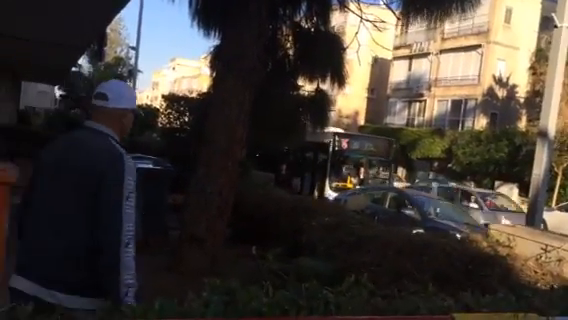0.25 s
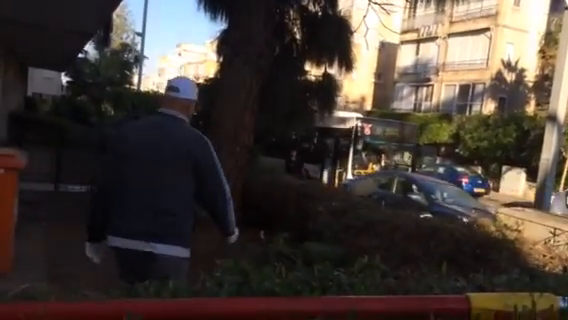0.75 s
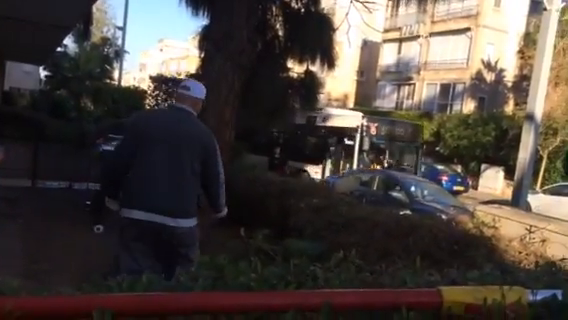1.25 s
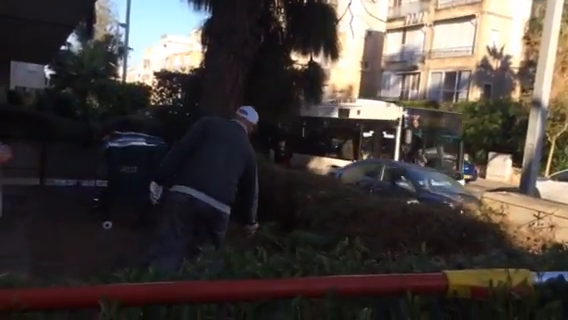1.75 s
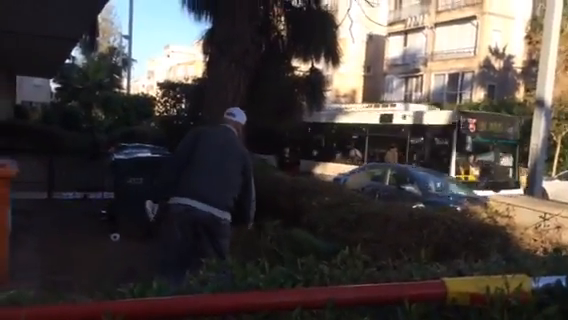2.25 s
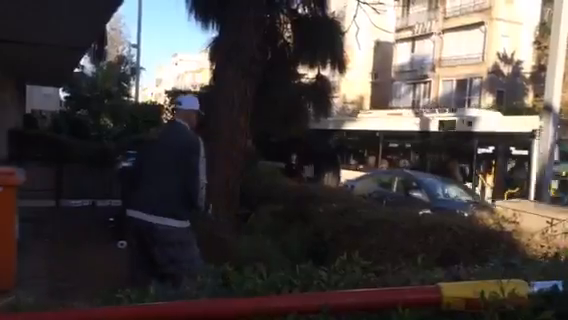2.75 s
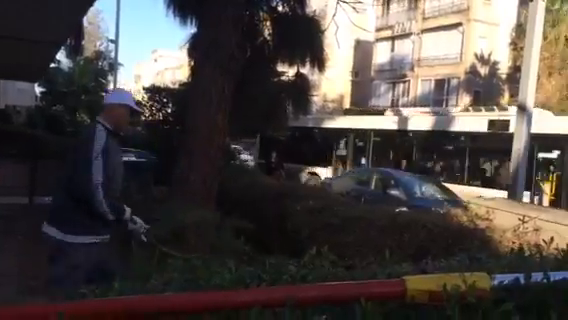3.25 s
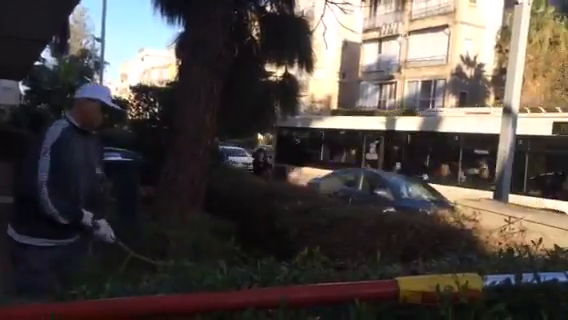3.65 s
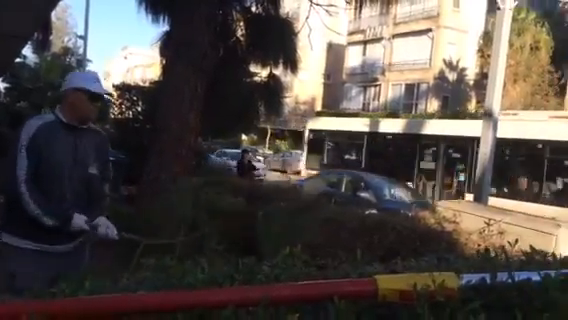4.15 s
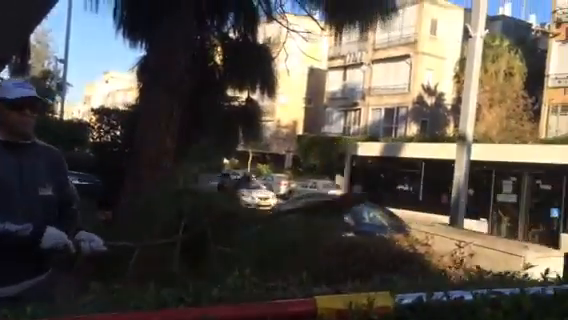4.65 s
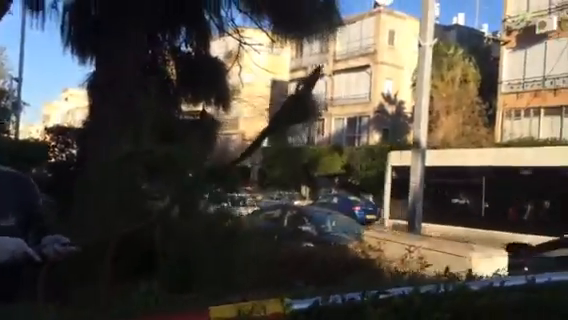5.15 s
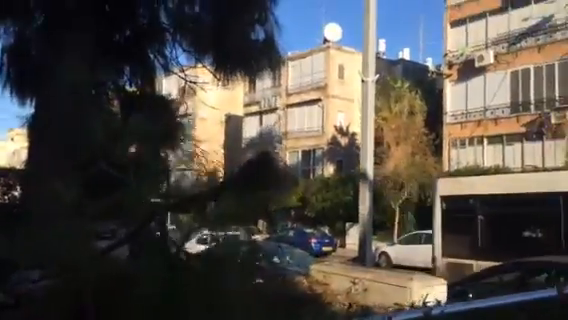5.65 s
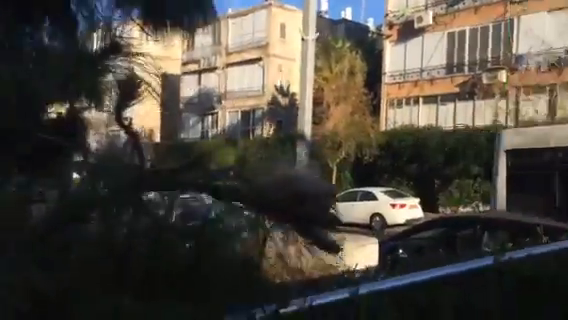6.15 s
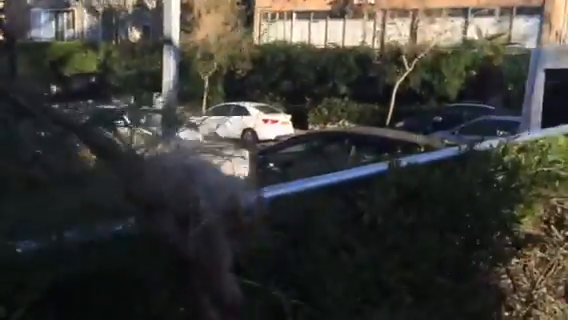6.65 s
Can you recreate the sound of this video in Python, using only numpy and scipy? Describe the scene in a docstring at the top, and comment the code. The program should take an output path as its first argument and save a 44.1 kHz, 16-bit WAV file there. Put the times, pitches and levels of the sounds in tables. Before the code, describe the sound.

A city street is heard from a front garden, with a low rumble and traffic roar throughout and slight echoes off the houses. A diesel bus idles, then from about 0.3 seconds its drone climbs in pitch, joined by a faint gear whine and a thin intake whistle. A car passes at around 0.6 seconds and another, fainter, near 2.3. Twigs tick softly close by during the first 2.5 seconds. From 3 to 4.5 seconds the bus passes close, its body ringing hollow as the whine and roar swell, with car engines humming behind it. The engine pitch dips for a gear change around 5 seconds, rises again, then falls near 6, where the brakes give a brief high squeal. From about 6.3 seconds the rear engine comes through with a fan rush and clatter, with two tiny squeaks and one more twig tick before the end near 7 seconds.

```python
"""A diesel bus drones up from idle and pulls away along a city street, heard on one microphone in a front
garden. Its firing rate drives the exhaust tones, the whine of gears and turbocharger, and the pulsing of the
intake. The hollow flank passes close, the engine shifts up, the brakes squeal briefly, and at last the rear
engine bay swings into the open with a clatter. Cars pass behind it in the roar of the street, the house fronts
send back echoes, and twigs tick softly near the microphone."""
import sys
import numpy as np
from scipy import signal
from scipy.fft import rfft, irfft
from scipy.io import wavfile
from scipy.ndimage import uniform_filter1d

SR = 44100
rng = np.random.default_rng(int(sys.argv[2]) if len(sys.argv) > 2 else 0)


def pcm_store(signal):
    """Save signal as 16-bit PCM."""
    levels = np.round(np.clip(np.atleast_2d(signal), -1, 1) * 32767)
    wavfile.write(sys.argv[1], SR, levels.astype(np.int16).T)


N = 304225
TIME = np.arange(N) / SR
BINS_HZ = np.fft.rfftfreq(N, 1 / SR)

# engine speed, from idle up through a gear change: time_s, firing_hz
ENGINE_SPEED = [(0, 28), (.33, 28.5), (.55, 38.5), (.85, 48), (1.15, 56), (1.8, 62), (2.6, 65.5), (3.2, 71),
                (4.4, 75), (4.85, 67), (5.05, 60), (5.28, 57), (5.55, 66), (5.77, 70), (6.25, 50),
                (6.5, 47.5), (6.9, 48.5)]
# firing tone ahead of the silencer: time_s, level_db
EXHAUST_STRENGTH = [(0, -29.5), (1.3, -26.5), (2.6, -22.5), (3.15, -31.5), (4.3, -30), (4.75, -24),
                    (5.75, -24.5), (6.05, -22), (6.45, -28.5), (6.9, -23.5)]
# what the silencer lets through of that tone and its octave: frequency_hz, gain_db
SILENCER_RESPONSE = [(41, -47), (47, -2), (62, 0), (78, 0), (84, -12), (94, -7.5), (116, -4.5), (124, -13),
                     (150, -12.5)]
# a partial cancels against its echo from the house fronts: time_s, half_length_s, depth, firing_multiple
ECHO_FADES = [(1.03, .09, .93, 1), (2.19, 0.13, .87, 1), (2.88, 0.088, 0.73, 1), (5.04, 0.19, .75, 1),
              (5.86, 0.062, 0.38, 1), (6.24, 0.084, 0.6, 1), (2.7, 0.27, .7, 2), (5.03, 0.38, .85, 2)]
# timing gears, belts and, highest, the turbocharger: firing_multiple, width_hz, level_db
WHINE_TONES = [(47.3, 100, -58.5), (73, 160, -63), (99, 110, -70.5), (116, 120, -69)]
# how openly their whine carries to the garden: time_s, gain_db
WHINE_CARRY = [(0, -14), (1.3, -8), (2.7, -4.5), (3.2, .5), (4.4, -1), (5, -5), (5.9, -1), (6.9, -3)]
# air drawn into the engine: time_s, centre_hz, level_db
INTAKE_HISS = [(.45, 4750, -65.5), (1.05, 4840, -53), (1.6, 4820, -53.5), (2.5, 4730, -54),
               (4.4, 4470, -50.5), (5, 4400, -67), (5.5, 4567, -56), (6.2, 4710, -59), (6.9, 4780, -44.5)]
# the engine bay opening toward the microphone: time_s, level_db
BAY_OPENING = [(5.9, -65), (6.2, -51), (6.4, -38), (6.55, -36.5), (6.7, -32), (6.9, -33)]
# its fan rush: frequency_hz, gain_db
BAY_SPECTRUM = [(82, -50), (140, 0), (164, 2), (257, -14), (512, -9.5), (788, -12.5), (941, -13),
                (1510, -14.5), (1800, -20), (2370, -15), (3720, -19.5), (4800, -23.5), (5300, -25.5),
                (11200, -32.5), (15300, -41)]
# its ringing parts: pitch_hz, width_hz, gain_db
BAY_RESONANCES = [(163.4, 5.4, -9), (211.5, 10, -10.5), (299, 58, -13.5), (386.4, 30, -15),
                  (547, 86, -13.5), (1523, 175, -20), (2180, 220, -36), (8250, 140, -32)]
# how near the side of the bus is: time_s, gain_db
FLANK_NEARNESS = [(0, -23), (2.7, -11), (3.1, 0), (4.1, 0.5), (4.6, -7), (5, -7), (5.6, -3.5), (6.3, -10),
                  (6.9, -14)]
# its hollow body: pitch_hz, width_hz, level_db
FLANK_RESONANCES = [(372, 30, -56), (580, 40, -51.5), (790, 70, -57), (1510, 110, -56.5)]
# brakes: loudest_s, half_length_s, pitch_hz, glide_hz_per_s, level_db
BRAKE_SQUEALS = [(5.95, .1, 5380, -400, -52.5), (6.73, .025, 10930, 0, -53), (6.84, .03, 10930, 0, -51)]
# engines behind the bus: loudest_s, half_length_s, pitch_hz, glide_hz_per_s, level_db
CAR_ENGINES = [(0.09, 0.28, 154, -31, -41), (0.866, .2, 146.3, 6.5, -39), (2.55, 0.44, 154, -9.5, -47),
               (3.738, 0.7, 109.3, 4, -37.5), (4.201, 0.31, 134.3, 20, -37.5),
               (5.986, 0.327, 151.1, 18, -41.5)]
# tyres of passing cars: nearest_s, half_length_s, level_db
CAR_PASSES = [(0.647, 0.56, -46), (2.27, 0.2, -54)]
# the song of those tyres: pitch_hz, width_hz, gain_db
TYRE_RESONANCES = [(287.2, 97, -0.5), (962, 250, 2.5)]
# twigs in the garden: start_s, level_db (3.5 dB below the peak), pitch_hz
TWIG_TICKS = [(.149, -48, 7000), (.356, -39, 6460), (.456, -44, 6000), (1.172, -45, 11000),
              (1.39, -44.5, 10000), (1.402, -48, 10000), (1.476, -49, 12000), (1.492, -48, 12000),
              (1.833, -45, 9500), (1.858, -48, 11000), (1.926, -51, 12000), (1.992, -43, 9000),
              (2.07, -51, 12000), (2.402, -49, 10500), (6.721, -37, 11000)]
# roar of engines and tyres, loudest as the bus draws level: time_s, level_db
ROAR_LEVEL = [(0, -43), (.4, -41), (1.3, -43), (1.9, -44), (2.3, -42.5), (2.8, -45.5), (3.07, -40.5),
              (4.4, -39.5), (4.95, -44), (5.45, -42), (6.25, -43)]
# the street's low rumble, its roar and its fine hiss: frequency_hz, gain_db
RUMBLE_SPECTRUM = [(20, -13), (34, -10), (48, 6.5), (85, 3), (140, 2), (175, -7.5), (240, -10.5),
                   (330, -16.5), (600, -49.5)]
ROAR_SPECTRUM = [(130, -12), (220, -1), (321, -5), (367, -0.5), (414, -2), (572, -0.5), (655, -1.5),
                 (968, -4.5), (1280, -5.5), (1490, -4.5), (1980, -9.5), (3340, -12.5), (3820, -14.5),
                 (4680, -16), (5500, -20), (7150, -32), (12100, -120)]
HISS_SPECTRUM = [(3000, -30), (4800, -3), (6000, 0), (7300, 0), (9000, -5), (11000, -4.5), (13000, -10),
                 (15300, -19)]


def exhaust(firing_hz, firings):
    """Firing tone and octave through the silencer, a weak third, and half orders from unequal cylinders."""
    angle = 2 * np.pi * firings
    level_db = curves(EXHAUST_STRENGTH)[0]
    silencer = np.transpose(SILENCER_RESPONSE)
    tone_gain = amp(level_db + np.interp(firing_hz, *silencer)) * echo_fade(1)
    octave_gain = amp(level_db - 4 + np.interp(2 * firing_hz, *silencer)) * echo_fade(2)
    tone = tone_gain * np.cos(angle) * (1 + .06 * drift(18))
    octave = octave_gain * np.cos(2 * angle + .1 * drift(8))
    third = np.cos(3 * angle) * (1 + .5 * drift(2.5))
    uneven = sum(np.cos(angle * order + drift(1.7)) for order in (1.5, 2.5))
    return np.sqrt(2) * (tone + octave + amp(-57.5) * third + amp(-56.5) * uneven)


def echo_fade(multiple):
    """The gain of one exhaust partial, dipping as it meets its echo at the microphone."""
    dips = [1 - depth * swell(s, half_s) for s, half_s, depth, k in ECHO_FADES if k == multiple]
    return np.prod(dips, axis=0)


def engine_whine(firing_hz):
    """Gears, belts and the turbocharger sing fuzzy tones locked to the engine, each fading in and out."""
    tones = sum(amp(db + 1.5 * drift(1.8)) * band(multiple * firing_hz, width_hz)
                for multiple, width_hz, db in WHINE_TONES)
    return amp(curves(WHINE_CARRY)[0]) * tones


def intake(firing_hz, firings):
    """The intake whistles at low engine speed and spreads into hiss as the speed rises."""
    centre_hz, level_db = curves(INTAKE_HISS)
    fall_above_hz, fall_db_per_hz = 56.4, .35
    whistle = amp(-fall_db_per_hz * np.maximum(firing_hz - fall_above_hz, 0)) * band(centre_hz, 300)
    hiss = .5 * band(.93 * centre_hz, 450)
    gulps = 1 + .11 * np.cos(2 * np.pi * firings)  # each cylinder draws air in turn
    return amp(level_db) * unit((whistle + hiss) * gulps)


def engine_bay(firings):
    """Fan rush and diesel clatter pulse with each firing, while small parts ring and rattle."""
    knock = 1 + .5 * np.exp(-(firings % 1) / .25) * (1 + .34 * drift(30))
    rush = colour(reflections(eddies(patch_db=1.4), wall_db=-5.5) * knock, BAY_SPECTRUM)
    rings = resonances(BAY_RESONANCES)
    clicks = (rng.random(N) < 500 / SR) * rng.standard_normal(N)  # about 500 a second
    rattle = amp(-17) * colour(clicks, [(1500, -25), (4500, 6), (12000, -7), (15000, -6)])
    return amp(curves(BAY_OPENING)[0]) * (rush + rings + rattle)


def flank():
    """The body of the bus rings hollow, loudest as its side passes the garden."""
    return amp(curves(FLANK_NEARNESS)[0]) * resonances(FLANK_RESONANCES)


def brake_squeal(loudest_s, half_length_s, pitch_hz, glide_hz_per_s, level_db):
    """A brake sings briefly on one unsteady note."""
    note = band(pitch_hz + glide_hz_per_s * (TIME - loudest_s), width_hz=110)
    return amp(level_db) * swell(loudest_s, half_length_s) * note


def car_engine(loudest_s, half_length_s, pitch_hz, glide_hz_per_s, level_db):
    """An engine farther out in the street swells and fades on a gliding hum."""
    cycles = np.cumsum(pitch_hz + glide_hz_per_s * (TIME - loudest_s)) / SR
    hum = np.sqrt(2) * np.sin(2 * np.pi * cycles + .18 * drift(6.6))
    return amp(level_db) * swell(loudest_s, half_length_s) * hum


def car_tyres():
    """The song of passing tyres falls off with distance from the microphone."""
    nearness = sum(amp(db) / (1 + ((TIME - s) / half_s) ** 2) for s, half_s, db in CAR_PASSES)
    return nearness * resonances(TYRE_RESONANCES)


def twigs():
    """Each twig close by gives a sharp tick and a short splintering tail."""
    out, t = np.zeros(N), np.arange(2048) / SR
    hz = np.fft.rfftfreq(len(t), 1 / SR) + 1
    decay = np.exp(-t / .0018) + .35 * np.exp(-t / .0098)
    for start_s, level_db, pitch_hz in TWIG_TICKS:
        burst = rng.standard_normal(len(t)) * decay
        tick = irfft(rfft(burst) * np.exp(-(np.log(hz / pitch_hz) / .39) ** 2))
        tick *= amp(level_db + 3.5) / abs(tick).max()
        span = out[round(start_s * SR):][:len(t)]
        span += tick[:len(span)]
    return out


def street():
    """Wandering rumble from the far lanes, with traffic roar and tyre hiss between the house fronts."""
    roar_db, usual_roar_db = curves(ROAR_LEVEL)[0], -42
    hiss_db = -56.5 + 1.04 * (roar_db - usual_roar_db)  # below the roar, swelling a little further
    screen_db = -3 * swell(3.9, 1.1)  # the bus screens the far lanes as it goes by
    rumble_db = -35.5 + 1.2 * drift(2.3) + screen_db
    rumble = amp(rumble_db) * colour(rng.standard_normal(N), RUMBLE_SPECTRUM)
    roar = amp(roar_db) * colour(reflections(eddies(patch_db=.95), wall_db=-11.5), ROAR_SPECTRUM)
    hiss = amp(hiss_db) * colour(reflections(eddies(patch_db=2), wall_db=-8.5), HISS_SPECTRUM)
    return rumble + roar + hiss


def reflections(x, wall_db, count=14):
    """House fronts and the road return delayed copies, which ripple the spectrum; rms 1."""
    delays_s, gains = rng.uniform(.004, .09, count), rng.standard_normal(count)
    gains /= np.linalg.norm(gains)
    walls = sum(gain * np.exp(-2j * np.pi * BINS_HZ * s) for s, gain in zip(delays_s, gains))
    return unit(irfft(rfft(x) * (1 + amp(wall_db) * walls), N))


def eddies(patch_db):
    """Turbulent noise whose level varies in patches of time and frequency; rms 1."""
    frames = dict(nperseg=1024, noverlap=768)
    spectra = signal.stft(rng.standard_normal(N), **frames)[2]
    patches = uniform_filter1d(rng.standard_normal(spectra.shape), size=6, axis=0)
    patches = unit(uniform_filter1d(patches, size=16, axis=1))
    return unit(signal.istft(spectra * amp(patch_db * patches), **frames)[1][:N])


def resonances(rows):
    """Noise ringing in several steady resonances."""
    return sum(amp(db) * band(hz, width_hz) for hz, width_hz, db in rows)


def band(hz, width_hz):
    """Noise ringing in one resonance that may move; rms 1."""
    angle = 2 * np.pi * np.cumsum(hz * np.ones(N)) / SR
    return unit(drift(width_hz / 2) * np.cos(angle) + drift(width_hz / 2) * np.sin(angle))


def drift(rate_hz):
    """Random wander up to a rate; rms 1."""
    return unit(irfft(rfft(rng.standard_normal(N)) / np.sqrt(1 + (BINS_HZ / rate_hz) ** 4), N))


def colour(x, spectrum):
    """Filters by points of frequency_hz, gain_db; rms 1."""
    hz, db = np.transpose(spectrum)
    gain = amp(np.interp(np.log(BINS_HZ + 1), np.log(hz + 1), db))
    return unit(irfft(rfft(x) * gain, N))


def swell(peak_s, half_length_s):
    """A bell-shaped rise and fall; 1 at its top."""
    return np.exp(-((TIME - peak_s) / half_length_s) ** 2)


def curves(rows):
    """Each column after time_s as a curve over time."""
    time_s, *columns = np.transpose(rows)
    return [np.interp(TIME, time_s, column) for column in columns]


def amp(db):
    """Decibels to gain."""
    return 10 ** (np.asarray(db) / 20)


def unit(x):
    """Scales to rms 1."""
    return x / np.sqrt(np.mean(x ** 2) + 1e-20)


def scene():
    """The street from the garden, in mono; one engine speed drives exhaust, whine, intake and clatter."""
    firing_hz = curves(ENGINE_SPEED)[0]
    firings = np.cumsum(firing_hz) / SR
    engine = exhaust(firing_hz, firings) + engine_whine(firing_hz)
    engine += intake(firing_hz, firings) + engine_bay(firings)
    brakes = sum(brake_squeal(*row) for row in BRAKE_SQUEALS)
    cars = car_tyres() + sum(car_engine(*row) for row in CAR_ENGINES)
    return (engine + brakes + cars + street() + flank() + twigs())[None]


def record(dry):
    """The recorder cuts off the highest treble."""
    edge_hz = 15250
    taps = signal.firwin(511, edge_hz, window=("kaiser", 9), fs=SR)
    return signal.oaconvolve(dry, taps[None], "same")


dry = scene()
out = record(dry)
pcm_store(out)
```